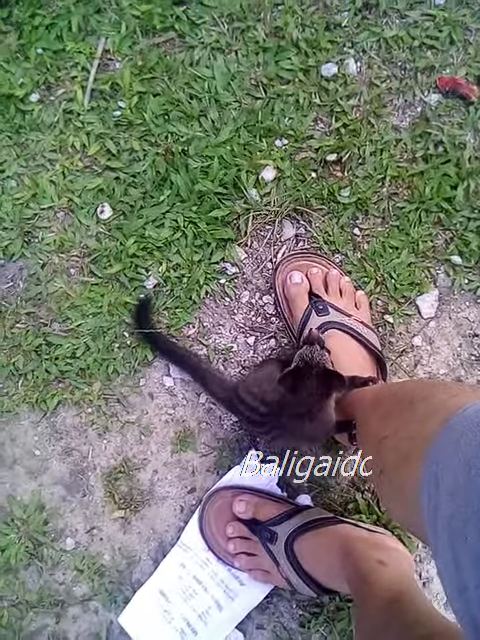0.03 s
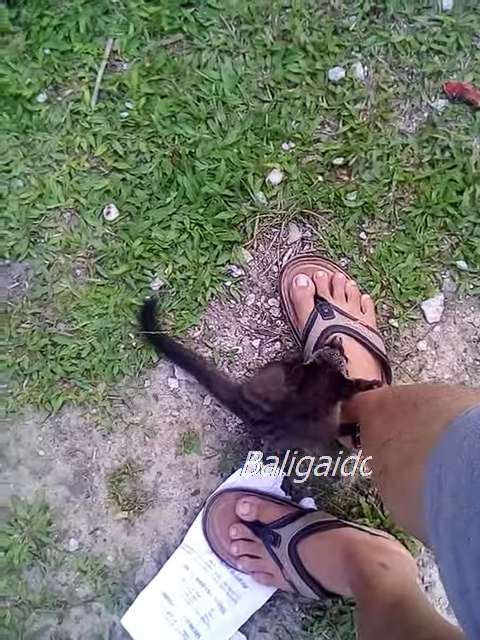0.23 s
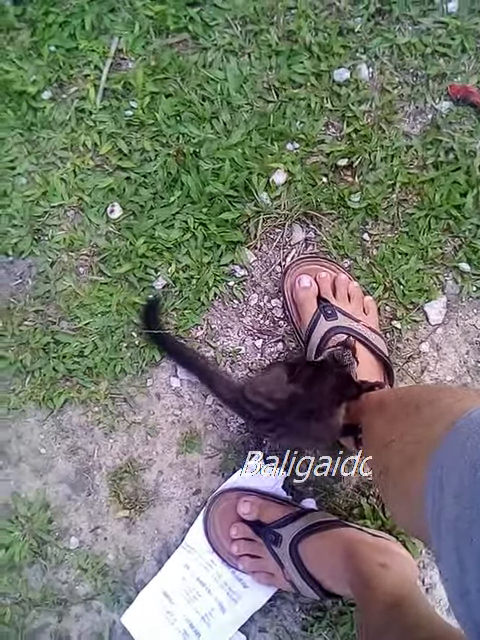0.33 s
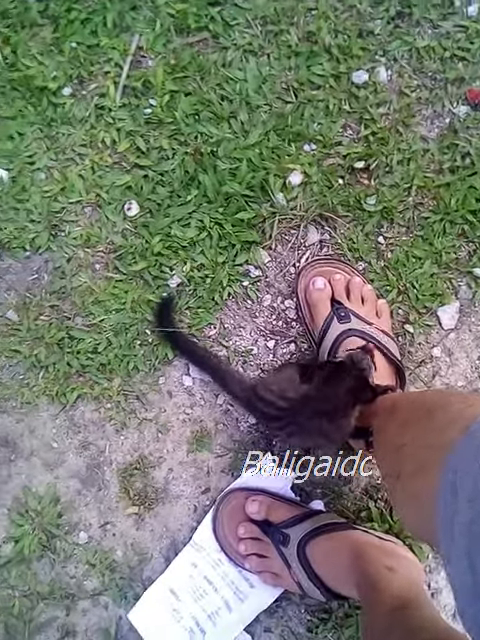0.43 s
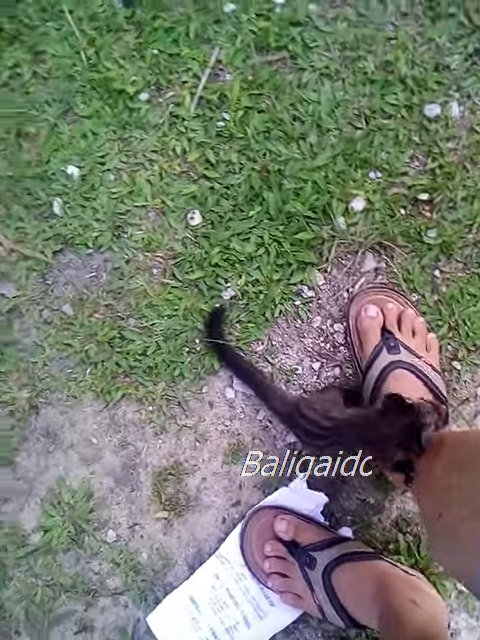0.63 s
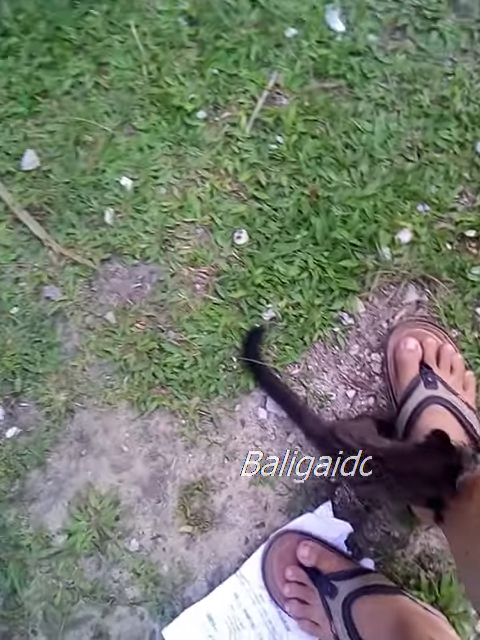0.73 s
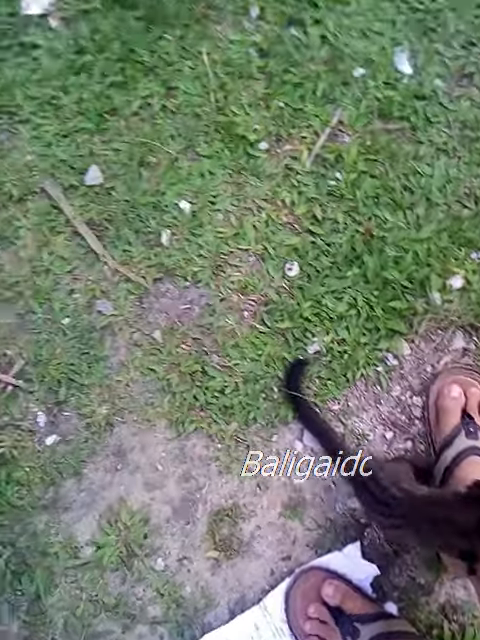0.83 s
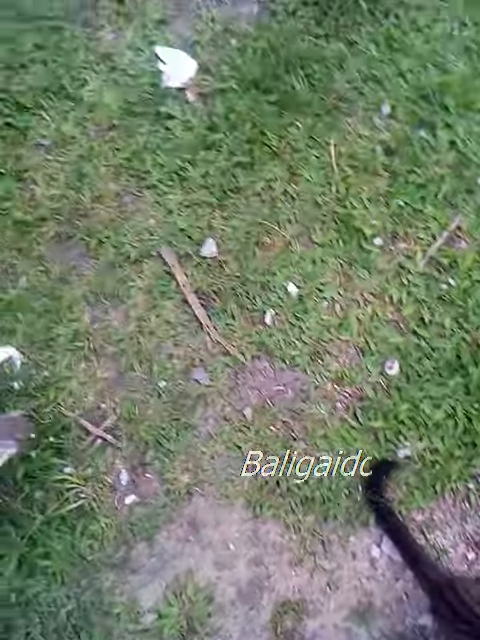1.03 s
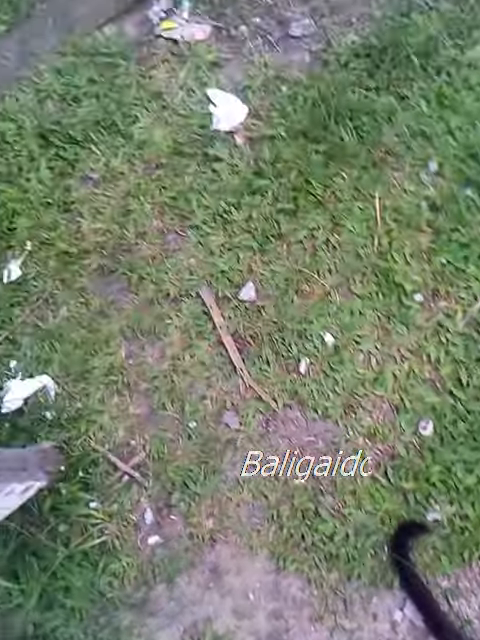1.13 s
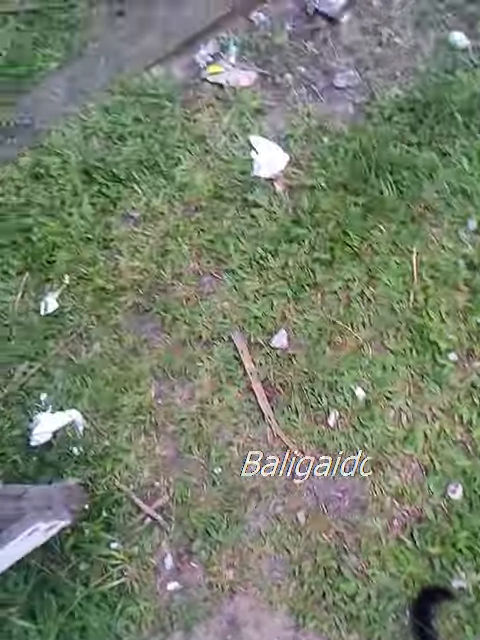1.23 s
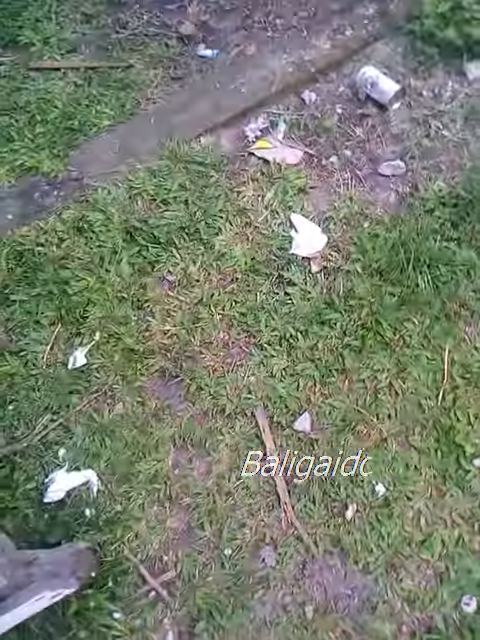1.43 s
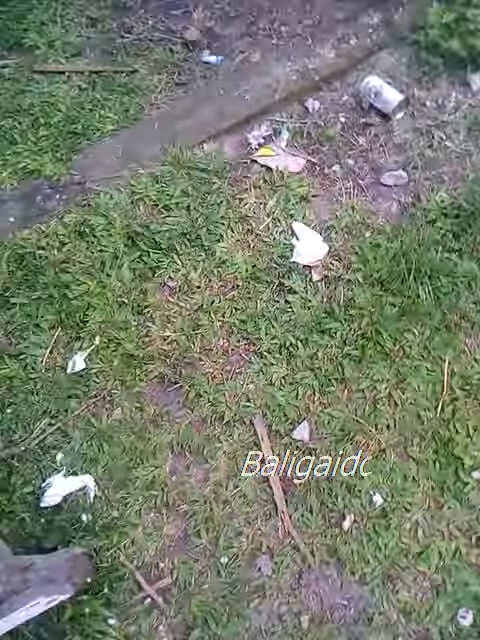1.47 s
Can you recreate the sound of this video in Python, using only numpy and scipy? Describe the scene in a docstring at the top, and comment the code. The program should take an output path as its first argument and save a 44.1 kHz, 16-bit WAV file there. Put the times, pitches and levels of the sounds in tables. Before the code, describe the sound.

Bursts of high animal chattering and trilling, first bright and near, then with the head turned; higher squeals cut in early between them. Open outdoor ground, slight wall reflection, low distant traffic, mono.

```python
"""A low chattering buzz, its pitch leaping up in quick arches, opens a close call between two young civets
on a lawn. The other cuts in with higher gliding squeals and one mouth smack. Both voices are breathy pulse
trains coloured by throat spectra, combed by near bounces and followed by a wall slap and a short scatter.
Behind them far traffic, made of coloured noise and wavering drones, rumbles and hisses; one microphone."""
import sys
import numpy as np
from scipy import signal
from scipy.fft import rfft, irfft
from scipy.io import wavfile
from scipy.ndimage import uniform_filter1d

SR = 44100
rng = np.random.default_rng(int(sys.argv[2]) if len(sys.argv) > 2 else 0)


def generate_wav(sig):
    """Save sig (samples, or channels by samples) to the path in sys.argv[1] as 16-bit PCM at SR."""
    pcm = np.round(np.clip(np.atleast_2d(sig).T, -1, 1) * 32767).astype(np.int16)
    wavfile.write(sys.argv[1], SR, pcm)


def gain_from_decibels(decibels):
    """Convert decibel values to linear amplitude factors."""
    exponent = np.asarray(decibels, float) / 20
    return 10 ** exponent


N = 154350
T = np.arange(N) / SR


def chatter():
    """A buzz at rest, lifted in pitch and made louder by each leap; overlapping leaps merge softly."""
    # Resting pitch of the buzz: start_s, pitch_hz [s, Hz]
    buzz = [(0, 457.7), (.065, 401.1), (.2, 377), (.26, 484), (.82, 497), (.9, 340.6), (1.16, 446),
            (1.86, 500.4), (1.925, 346.3), (2.04, 427), (2.165, 437.8), (2.2, 318.4), (2.25, 326),
            (2.42, 341.2), (2.84, 594), (2.915, 505.4), (3.044, 744.4), (3.19, 490), (3.37, 388.6),
            (3.5, 473)]
    # Pitch leaps, each an arch about its peak: peak_s, top_hz, rise_s, fall_s [s, Hz, s, s]
    leaps = [(.003, 1544, 0.025, .024), (0.138, 1748, 0.033, .02), (.843, 2030, 0.013, .016),
             (.954, 1700, 0.025, .02), (1.118, 1840, 0.021, .02), (1.88, 2126, 0.017, .014),
             (1.981, 1859, .022, .022), (2.111, 1920, .031, .024), (2.329, 2174, .03, .022),
             (2.864, 2305, .012, .022), (2.974, 1897, 0.03, .022), (3.003, 1277, 0.0405, .024),
             (3.083, 1333, 0.023, 0.033), (3.115, 1983, 0.036, .034), (3.283, 2144, .042, 0.035),
             (3.464, 2237, 0.03, 0.027)]
    # Calls facing near, before the leap gain: start_s, level_db, treble_db [s, dB, dB]
    near_calls = [
        [(0, -37.5, 3.5), (.03, -41.5, 0.5), (.08, -46.5, -7), (.138, -41, 6), (.2, -45.5, 0.5),
         (.25, -46.5, -17)],
        [(.824, -53, -5), (.843, -40, -3), (.9, -48.5, -25.5), (.955, -44, 9), (1.04, -56.5, -3),
         (1.117, -42, -2), (1.15, -49.5, -7), (1.17, -97.5, -14)],
    ]
    # Calls with the head turned, before the leap gain: start_s, level_db, treble_db [s, dB, dB]
    turned_calls = [
        [(1.858, -58, -4), (1.875, -49, 3.5), (1.94, -51, 1), (1.985, -44.5, 7), (2.05, -49.5, -0.5),
         (2.11, -43, 10), (2.17, -49, 1), (2.245, -57.5, -22), (2.295, -48, -15), (2.315, -48, 7),
         (2.36, -48, -1.5), (2.405, -60, -12), (2.43, -71, -5)],
        [(2.846, -52.5, -1), (2.87, -46.5, 1.5), (2.91, -50, 2), (2.96, -45, -3.5), (3.04, -46.5, 1),
         (3.115, -43.5, -2), (3.18, -50, 2.5), (3.25, -46.5, -5), (3.3, -46, 6.5), (3.37, -52, -16),
         (3.43, -45.5, -3.5), (3.5, -42.5, 8.5)],
    ]
    # Throat colour facing near, relative: freq_hz, gain_db [Hz, dB]
    near_throat = [(1800, -29.5), (2600, -19.5), (3150, -33.5), (3830, -15), (4340, -20), (5300, -7.5),
                   (5900, 7), (6590, -3.5), (7210, -1.5), (8500, -14), (9400, -23), (10500, -25.5),
                   (11800, -44), (13500, -42.5), (15500, -46)]
    # Throat colour with the head turned, relative: freq_hz, gain_db [Hz, dB]
    turned_throat = [(1900, -64.5), (2150, -9), (2500, -9), (3200, -16.5), (3550, -20.5), (3900, -10),
                     (5180, 7), (5600, 5), (6730, 1), (7880, 0.5), (8700, -8.5), (9500, -18.5),
                     (11300, -40), (13000, -33.5), (15500, -43)]
    squareness, blend = 2.4, 5.1  # flatness of an arch; how sharply the highest leap wins

    rest = np.interp(T, *np.transpose(buzz))
    lift_power = 0
    for peak_s, top_hz, rise_s, fall_s in leaps:
        distance = np.abs(T - peak_s) / np.where(T < peak_s, rise_s, fall_s)
        arch = np.exp(-np.minimum(distance, 5.0) ** squareness)
        lift_power = lift_power + (np.maximum(top_hz - rest, 1) * arch) ** blend
    pitch = rest + lift_power ** (1 / blend)
    octaves = np.log2(pitch / rest)

    # A lifted voice is steadier and less breathy
    source = glottis(pitch, jitter=.010 * rest / pitch + .003, breath_db=-10 - 4 * octaves, shimmer_db=2.2)
    out = 0
    for calls, throat, treble_hz in ((near_calls, near_throat, 7500), (turned_calls, turned_throat, 5800)):
        s, _, treble_db = np.transpose(np.vstack(calls))
        treble = np.interp(T, s, treble_db)
        out = out + voice(colour(source, throat), envelope(calls), treble, treble_hz, wander_db=2)
    # Leaps push a burst of top treble, 1 dB per octave, and 2 dB per octave of level
    out = shelf(out, 1 * octaves, 11860, "high")
    return out * gain_from_decibels(2 * octaves)


def squeals():
    """Clean high glides; the throat colour shifts between shut and open as the mouth moves."""
    # Squeal calls: start_s, pitch_hz, level_db [s, Hz, dB]
    calls = [
        [(.666, 1731, -67), (.672, 1672, -57.5), (.682, 2194, -56.5), (.692, 3607, -43.5), (.702, 4120, -40.5),
         (.712, 3540, -48.5), (.723, 2540, -40), (.74, 1711, -49), (.755, 1406, -45), (.766, 1402, -49),
         (.775, 1607, -48)],
        [(.95, 2209, -52.5), (.959, 2802, -37), (.968, 3045, -25.5), (.98, 2737, -35.5), (.995, 1980, -38.5),
         (1.012, 1838, -38.5), (1.032, 1479, -39.5), (1.052, 1734, -37), (1.07, 2110, -38),
         (1.108, 2230, -39.5), (1.118, 1990, -40.5), (1.13, 1592, -38), (1.153, 1327, -42),
         (1.165, 1132, -37.5), (1.185, 1090, -39), (1.198, 1157, -39.5), (1.22, 1688, -44.5),
         (1.234, 2163, -35), (1.245, 2510, -40.5), (1.258, 2770, -37.5), (1.272, 2285, -38.5),
         (1.291, 2018, -42), (1.315, 1298, -45), (1.342, 1087, -48.5), (1.356, 1163, -43), (1.366, 1290, -48.5)],
    ]
    # The squealer's mouth: start_s, openness, treble_db [s, 0-1, dB]
    mouth = [(0.666, 0.6, -33), (.703, 0.98, -25), (0.711, 0.84, 0.5), (.78, 0.44, -19),
             (0.952, 0.38, -11.5), (1.0, 0, 3), (1.12, 0.08, -2), (1.203, 0.32, 3.5), (1.369, 0.72, -8)]
    # Throat colour with the mouth open, relative: freq_hz, gain_db [Hz, dB]
    open_throat = [(1060, -54.5), (1800, -51.5), (2210, -4.5), (2520, -13.5), (3080, -4.5), (3630, 5),
                   (4080, -0.5), (4900, 9), (5800, -19.5), (6820, -2), (8500, -24.5), (9800, -20.5),
                   (10500, -27.5), (11300, -25.5), (15500, -42)]
    # Throat colour with the mouth shut, relative: freq_hz, gain_db [Hz, dB]
    shut_throat = [(1060, -55), (1800, -29.5), (2150, -2.5), (2600, -11.5), (3300, -25), (4150, -13),
                   (4700, -0.5), (5800, 4.5), (6800, -5.5), (7800, -13), (9290, -29), (10800, -31.5),
                   (12100, -36), (15500, -52)]

    s, hz, _ = np.transpose(np.vstack(calls))
    glide = uniform_filter1d(np.interp(T, s, hz), size=250)
    source = glottis(glide, jitter=.005, breath_db=-10, shimmer_db=1.6)
    s, openness, treble_db = np.transpose(mouth)
    opened = np.interp(T, s, openness)
    blended = opened * colour(source, open_throat) + (1 - opened) * colour(source, shut_throat)
    level = envelope([np.array(call)[:, ::2] for call in calls])
    return voice(blended, level, np.interp(T, s, treble_db), treble_hz=4485, wander_db=3.5)


def smack():
    """The squealer's mouth smacks shut: one impulse rings through a band-pass."""
    click = np.zeros(N)
    click[int(1.369 * SR)] = gain_from_decibels(-24)
    return signal.sosfilt(signal.butter(4, [1800, 4800], "band", fs=SR, output="sos"), click)


def glottis(pitch, jitter, breath_db, shimmer_db):
    """Sharp pulses, a closed-form sum of equal harmonics, with slight jitter and a puff of breath each cycle."""
    pitch = pitch * (1 + jitter * drift(150))
    phase = 2 * np.pi * np.cumsum(pitch) / SR
    count = np.floor(.36 * SR / pitch)  # harmonics that fit safely below half the sample rate
    harmonics = np.sin((count + .5) * phase) / (np.sin(phase / 2) + 1e-9) - 1
    pulses = harmonics / np.sqrt(2 * count)
    hiss = np.diff(rng.standard_normal(N + 1))
    return pulses * gain_from_decibels(shimmer_db * drift(200)) + gain_from_decibels(breath_db) * hiss * (1 + np.cos(phase))


def envelope(calls):
    """Level curves (column 1) of separate calls, each opening and shutting fast, silent between."""
    out = np.zeros(N)
    for rows in calls:
        s, db = np.array(rows)[:, 0], np.array(rows)[:, 1]
        inside = np.minimum(T - s[0], s[-1] - T)  # seconds within the call, negative outside
        gate = np.clip(1 + inside / 0.0045, 0, 1)
        out = np.maximum(out, gain_from_decibels(np.interp(T, s, db)) * gate)
    return out


def voice(v, level, treble_db, treble_hz, wander_db):
    """Treble opens with effort; the level is evened over a few ms, then shaped by the call."""
    v = wandering(shelf(v, treble_db, treble_hz, "high"), wander_db)
    power = uniform_filter1d(uniform_filter1d(v * v, size=350), size=350)
    return level * v / np.sqrt(power + 1e-20)


def wandering(v, depth_db):
    """Patches about 700 Hz wide and 15 ms long swell and fade at random."""
    _, _, z = signal.stft(v, nperseg=256, noverlap=192)
    field = rng.standard_normal(z.shape)
    for axis, size in ((0, 4), (1, 8)) * 2:  # smooth twice over frequency and time
        field = uniform_filter1d(field, size=size, axis=axis)
    _, out = signal.istft(z * gain_from_decibels(depth_db * rms_one(field)), nperseg=256, noverlap=192)
    return out[:N]


def bounced(x, offset_db):
    """Close bounces off ground and legs comb a voice; their delays shift a little as the animals move."""
    # Bounces, before drift and offset: delay_ms, level_db [ms, dB]
    bounces = [(.78, -6), (2.9, -8)]
    out = x
    for delay_ms, level_db in bounces:
        delay_s = delay_ms / 1000 * (1 + .012 * drift(1.5))
        out = out + gain_from_decibels(level_db + offset_db) * np.interp(T - delay_s, T, x)
    return out


def surroundings(x):
    """A dull wall slap and a short decaying scatter follow the voices."""
    decay_s, start_s, scatter_db = 0.19, 0.0026, -14  # time to fall 60 dB, onset, total level
    wall_s, wall_db = 0.024, -23
    t = np.arange(SR // 4) / SR
    tail = rng.standard_normal(len(t)) * gain_from_decibels(-60 * t / decay_s) * (t > start_s)
    tail *= gain_from_decibels(scatter_db) / np.sqrt(np.sum(tail ** 2))
    tail[int(wall_s * SR)] += gain_from_decibels(wall_db)
    dull = signal.sosfilt(signal.butter(4, 7300, fs=SR, output="sos"), x)
    return x + signal.fftconvolve(dull, tail)[:N]


def traffic():
    """Far roar and swelling rumble from noise split at 180 Hz, with three wavering sine engine drones."""
    # Far traffic colour, relative: freq_hz, gain_db [Hz, dB]
    far = [(20, -5.5), (38, -13.5), (65, 0.5), (124, -3), (169, -12), (207, -16), (268, -19), (394, -23),
           (852, -27), (1840, -33), (2710, -41.5), (7000, -53), (8000, -62), (15500, -61.5)]
    # Swell of the roar between 180 and 900 Hz, relative: start_s, gain_db [s, dB]
    roar_swell = [(0, 1.5), (1.3, -4.5), (3.5, -5.5)]
    # Rumble below 180 Hz: start_s, level_db [s, dB]
    rumble = [(0, -51.5), (.8, -55.5), (1.9, -50), (3.5, -51.5)]
    # Engine drones, centre and spread of their drift: pitch_hz, width_hz [Hz, Hz]
    drones = [(66, 4.2), (115, 3.71), (137, 3.99)]
    # Drone levels before wavering: start_s, first_db, second_db, third_db [s, dB, dB, dB]
    drone_levels = [(0, -66, -51, -68), (1.699, -72.5, -57.5, -54), (2, -47.5, -52.5, -59.5),
                    (2.901, -56.5, -58, -57), (3.1, -54.5, -67.5, -51), (3.5, -52.5, -50, -53)]

    noise = colour(rng.standard_normal(N), far)
    low = signal.sosfilt(signal.butter(4, 180, fs=SR, output="sos"), noise)
    high = signal.sosfilt(signal.butter(4, 180, "high", fs=SR, output="sos"), noise)
    high = shelf(high, np.interp(T, *np.transpose(roar_swell)), 900, "low", order=2)
    out = gain_from_decibels(-59.5 + 1.1 * drift(9)) * rms_one(high)
    out += gain_from_decibels(np.interp(T, *np.transpose(rumble))) * rms_one(low)
    s, *levels = np.transpose(drone_levels)
    for (pitch_hz, width_hz), db in zip(drones, levels):
        phase = 2 * np.pi * np.cumsum(pitch_hz + width_hz * drift(3.24)) / SR
        out += gain_from_decibels(np.interp(T, s, db) + 3.5 * drift(2.1)) * np.sqrt(2) * np.sin(phase)
    return out


def rms_one(x):
    """Scale to an rms of 1."""
    return x / np.sqrt(np.mean(x ** 2) + 1e-20)


def drift(rate_hz):
    """Slow chance of spread 1: noise through two one-pole low-passes at the given rate."""
    r = np.exp(-2 * np.pi * rate_hz / SR)
    noise = rng.standard_normal(N + SR)
    return rms_one(signal.lfilter([1], [1, -2 * r, r * r], noise)[SR:])  # drop the settling second


def shelf(x, gain_db, edge_hz, side, order=4):
    """Raise or lower one side of an edge by a moving gain, with no phase shift."""
    band = signal.sosfiltfilt(signal.butter(order, edge_hz, side, fs=SR, output="sos"), x)
    return x + (gain_from_decibels(gain_db) - 1) * band


def colour(x, spectrum):
    """Causal (minimum phase) filter with the given spectrum, built by folding its cepstrum."""
    size = 8192
    hz, db = np.transpose(spectrum)
    grid_hz = np.arange(size // 2 + 1) * SR / size
    log_gain = np.interp(np.log(grid_hz + 1), np.log(hz), db) * np.log(10) / 20
    cepstrum = irfft(log_gain)
    cepstrum[1:size // 2] *= 2
    impulse = irfft(np.exp(rfft(cepstrum[:size // 2], size)))
    return signal.fftconvolve(x, impulse)[:N]


def scene():
    """Everything reaches one microphone, heard alike on both channels."""
    chatterer = bounced(chatter(), offset_db=0)
    squealer = bounced(squeals() + smack(), offset_db=-3)  # stands clearer of legs and ground
    mono = surroundings(chatterer + squealer) + traffic()
    return np.tile(mono, (2, 1))


def band_limit(x):
    """A steep low-pass at the top of the band."""
    return signal.sosfilt(signal.butter(12, 15500, fs=SR, output="sos"), x)


def record(dry):
    """Deliver the finished mix."""
    return band_limit(dry)


dry = scene()
out = record(dry)
generate_wav(out)
```